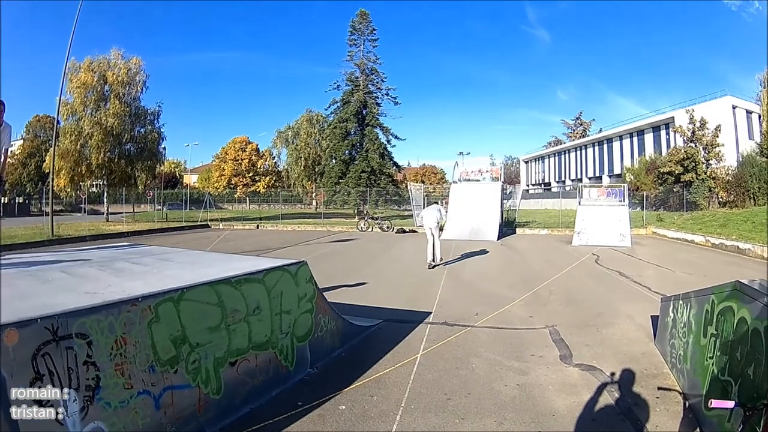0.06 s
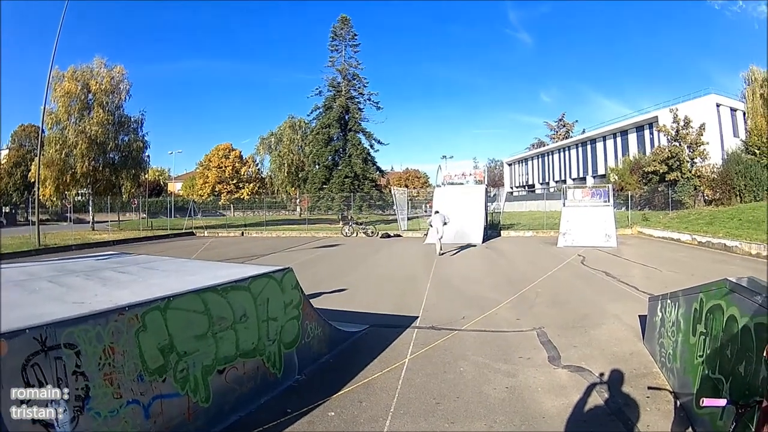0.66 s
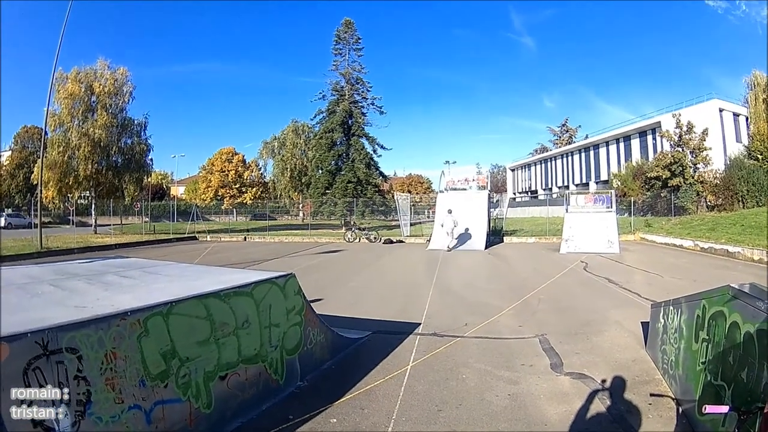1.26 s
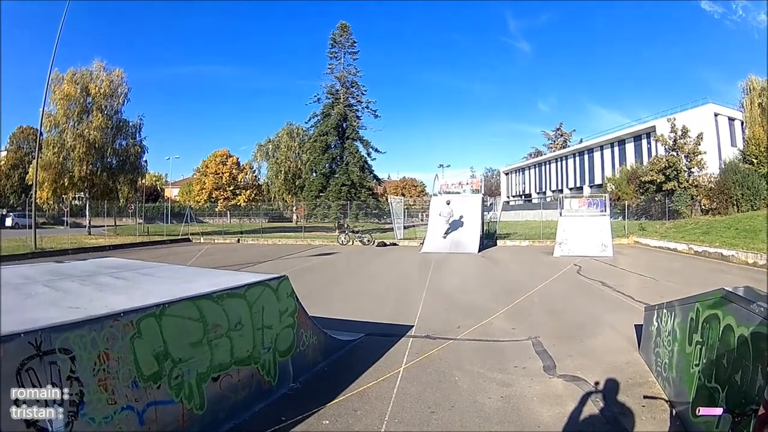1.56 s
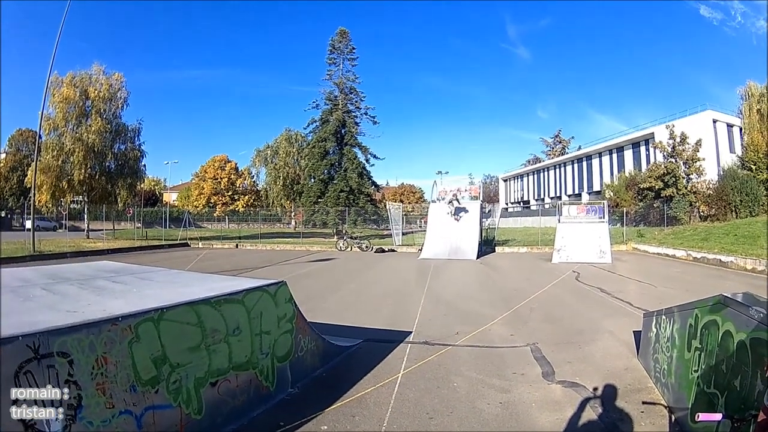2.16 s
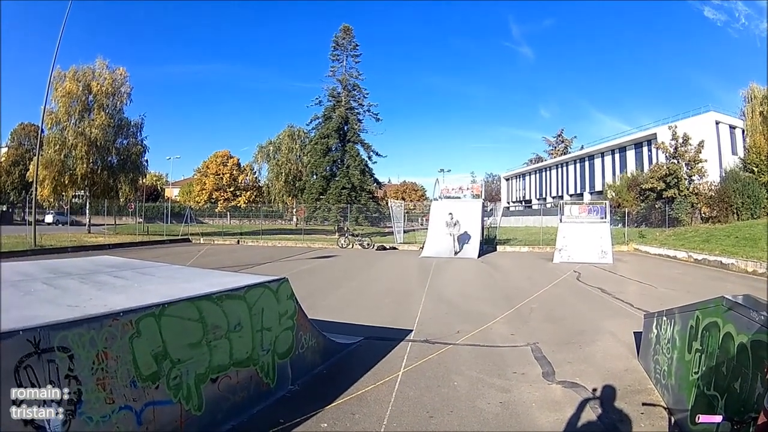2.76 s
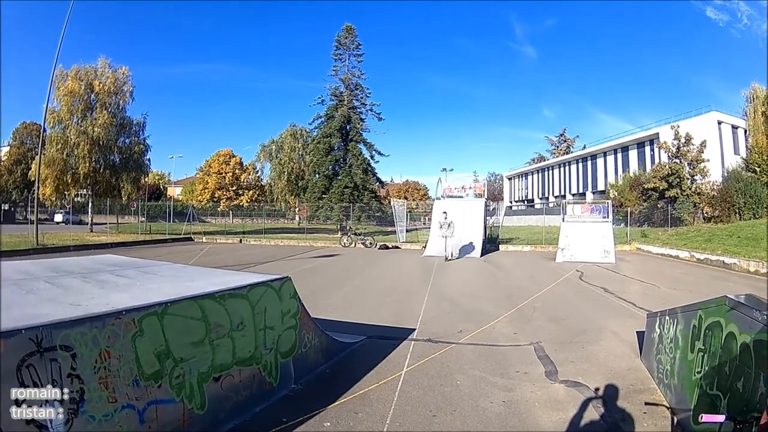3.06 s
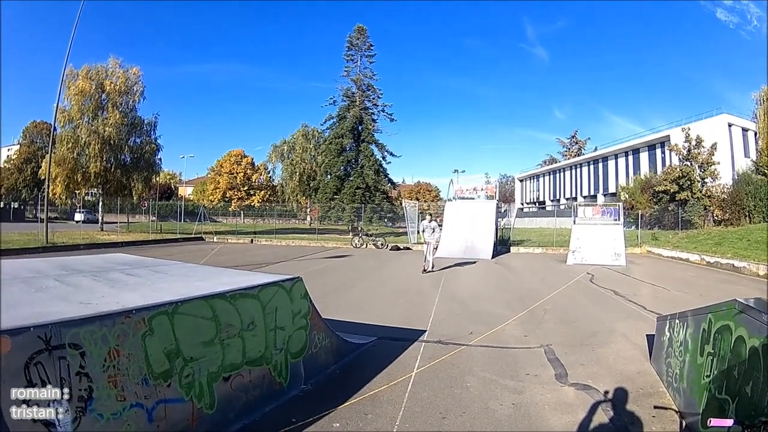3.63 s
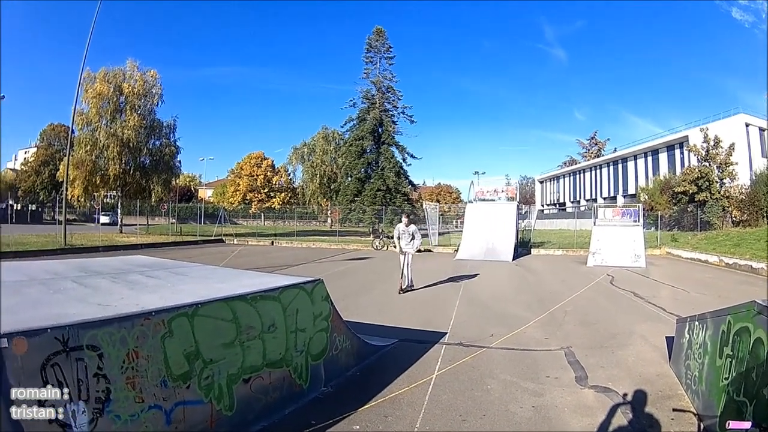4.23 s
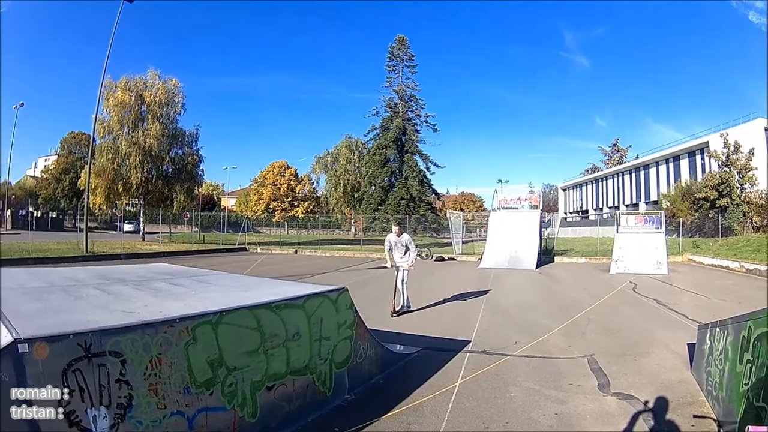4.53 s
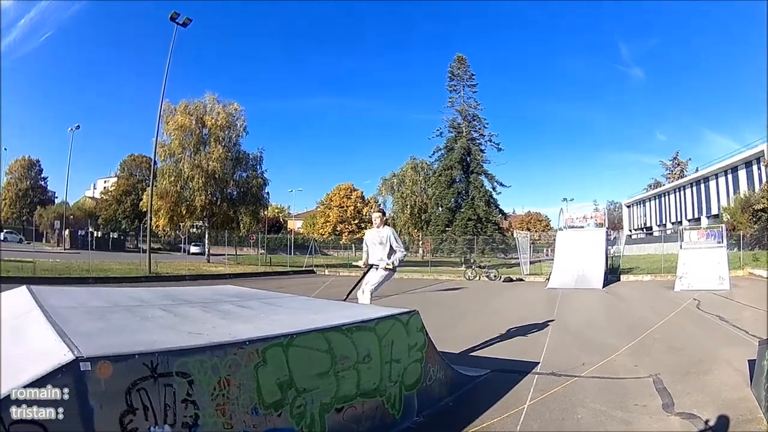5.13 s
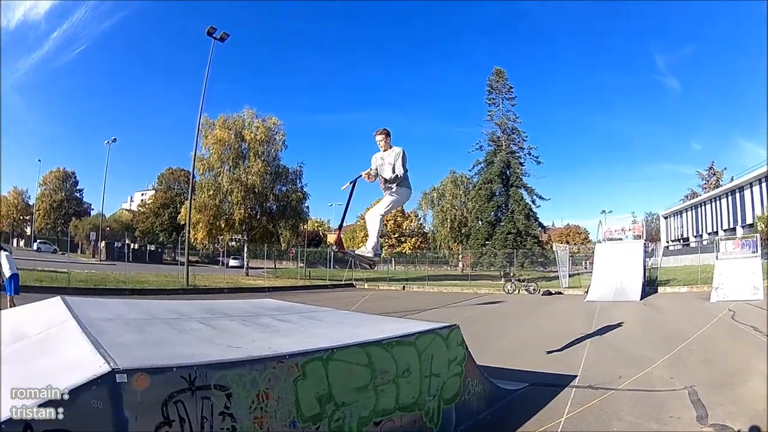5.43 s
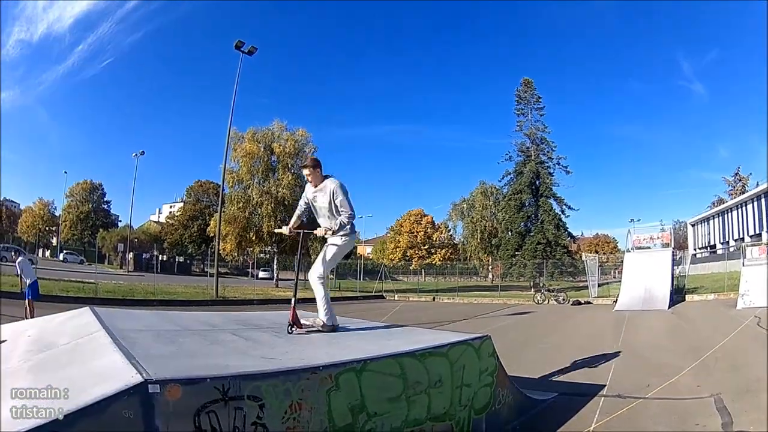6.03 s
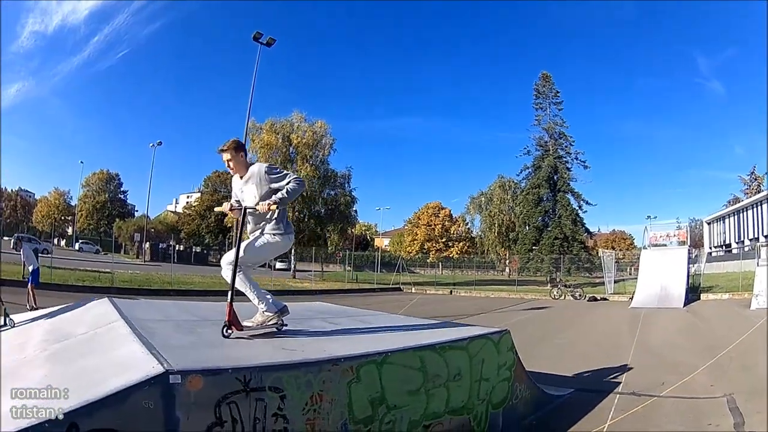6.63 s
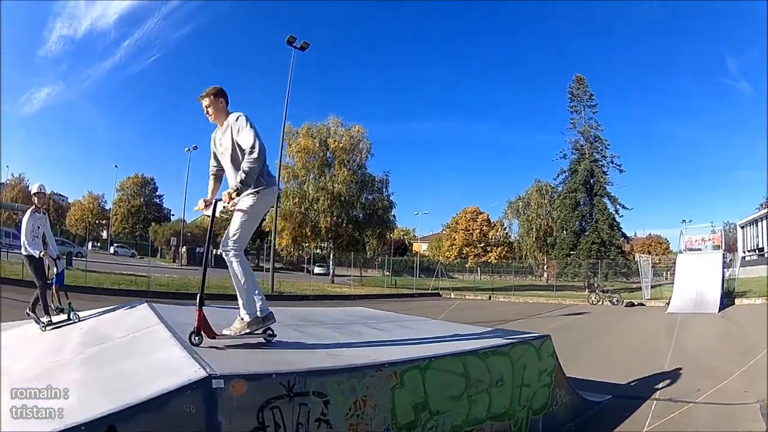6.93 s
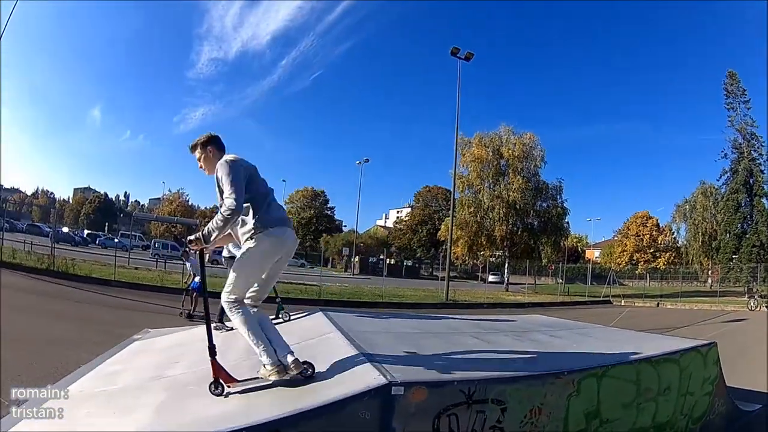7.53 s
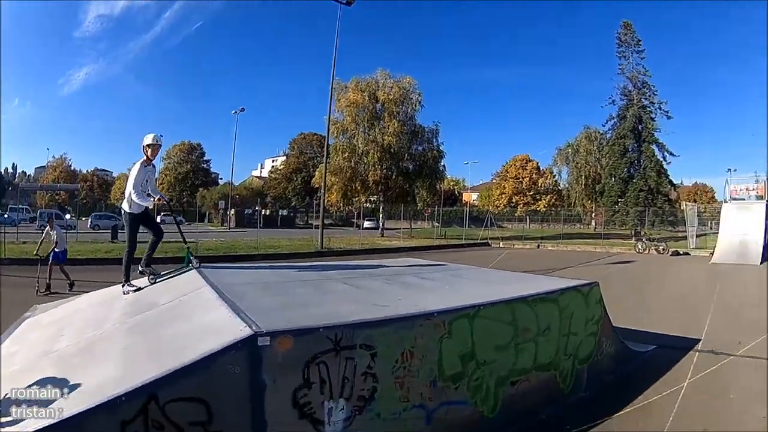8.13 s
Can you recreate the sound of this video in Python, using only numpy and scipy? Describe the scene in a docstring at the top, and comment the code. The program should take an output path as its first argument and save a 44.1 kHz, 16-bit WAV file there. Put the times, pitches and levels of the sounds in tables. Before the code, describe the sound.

A stunt scooter rolls away over gritty concrete in an outdoor skatepark, its hard wheels clacking on joints. It knocks against a distant ramp, goes briefly quiet in the air, lands and rolls back. Close to the microphone it bangs up a hollow box and lands twice with loud, booming, rattling slams. A few last clacks leave a short metallic ping. Faint traffic hums underneath.

```python
"""A stunt scooter rolls away across an outdoor concrete skatepark, hard wheels rumbling over grit and
clacking on joints. It bangs into a far quarter pipe, turns in the air, lands and comes back. It rides
up a hollow box close by and jumps on top: the deck rattles and the box booms. Rubber squeaks, the
scooter drops onto the far slope, and a last knock leaves a metal part ringing. Far traffic lies under
it all."""
import sys
import numpy as np
from scipy import signal
from scipy.fft import rfft, irfft
from scipy.io import wavfile
from scipy.ndimage import uniform_filter1d, minimum_filter1d

SR = 44100
rng = np.random.default_rng(int(sys.argv[2]) if len(sys.argv) > 2 else 0)


def digitize_waveform(pressure):
    """Quantize a signal to 16-bit integers and store it at the path in sys.argv[1].

    Rows of a 2-D input are taken as channels; values are limited to [-1, 1].
    """
    field = np.atleast_2d(pressure).T
    bounded = np.clip(field, -1, 1)
    quanta = np.round(bounded * 32767).astype(np.int16)
    wavfile.write(sys.argv[1], SR, quanta)


N = 365148
TIME = np.arange(N) / SR

# Wheels on the ground: away, up the pipe, down it, back, up the box, across it, down its slope.
# Each row: start and end in seconds, coasting roar in dB, rumble and grit in dB against the roar.
RIDES = [(0, 1.048, -49, -12.5, -20), (1.444, 1.83, -42.5, -13.5, -16), (2.31, 3.266, -45.5, -15.5, -17.5),
         (3.28, 4.67, -50.5, -12.5, -19.5), (4.7, 5.446, -48.5, -11, -13.5),
         (5.87, 6.948, -53.5, -9.5, -21), (7.45, 8.3, -43.5, -8.5, -19.5)]
# The roll's midrange roar, low rumble and crisp grit. Each row: frequency in Hz, level in dB.
ROAR_EQ = [(200, -33), (450, -5.5), (750, -1.5), (1000, -4), (1350, 5), (1650, -3), (2150, -2.5),
           (2700, -5.5), (3500, -27), (5000, -51.5)]
RUMBLE_EQ = [(20, 2), (55, 4), (90, 3.5), (170, 2.5), (350, 3), (600, -4.5), (1200, -53.5)]
GRIT_EQ = [(1500, -18.5), (2700, 9.5), (3600, -1), (4200, -15), (4900, -17), (5700, -25.5), (7000, -45.5)]
def rolling(touch_s=0.075, release_s=0.092, grit_per_load=1.4, patchy_db=2.0):
    """Hard wheels on rough concrete: bumps shake scooter and ground, grit ticks; all grow with load."""
    roar, rumble, grit = np.zeros((3, N))
    for start, end, db, rumble_db, grit_db in RIDES:
        attack = np.clip((TIME - start) / touch_s + 1, 0, 1)
        release = np.exp(-np.maximum(TIME - end, 0) / release_s)
        contact = undb(db) * attack * release
        roar = np.maximum(roar, contact)
        rumble = np.maximum(rumble, undb(rumble_db) * contact)
        grit = np.maximum(grit, undb(grit_db) * contact)
    load_db = wheel_load()
    bumps = grains(N, 3500, spread_db=2.5)
    stones = bumps + grains(N, 120, spread_db=4.5)
    even_bumps = grains(N, 5000, spread_db=0)
    out = roar * undb(load_db) * unit(through(bumps, response(ROAR_EQ, body=0.36)))
    out += rumble * undb(load_db) * unit(through(even_bumps, response(RUMBLE_EQ, body=0.69)))
    out += grit * undb(grit_per_load * load_db) * unit(through(stones, response(GRIT_EQ, body=0.5)))
    return out * undb(patchy_db * drift(45))


# The rider pumps or sinks into a landing.
# Each row: peak time in seconds, extra roar in dB, settling time in seconds.
PRESSES = [(0, 13, 0.13), (.5, 5.5, 0.32), (0.849, 5, 0.11), (1.78, 3, .1), (2.72, 7, 0.39),
           (4.85, 12, 0.15), (6.02, 21.5, 0.14), (6.25, 7.5, 0.32), (7.56, 4, 0.48)]
def wheel_load(rise_s=0.11):
    """Extra roar in dB as the rider's weight presses the wheels down and eases off."""
    return sum(db * np.exp(-np.abs(TIME - s) / np.where(TIME < s, rise_s, settle_s))
               for s, db, settle_s in PRESSES)


# Wheels and deck strike a ramp. Each row: start in seconds, levels of clack, boom, metallic crack
# and ramp ring in dB, time between bounces in seconds, change per bounce in dB.
LANDINGS = [(1.127, -34, -46, -47, -29.5, 0.0094, -2), (1.216, -24, -37.5, -39, -33.5, .008, -5),
            (2.065, -61, -45, -73.5, -45, 0.013, -5), (2.318, -36, -49, -49, -43, 0.011, -8),
            (2.360, -31, -52, -50, -41.5, .02, -11), (4.666, -19, -44, -22.5, -24, .008, -0.5),
            (4.756, -11, -33.5, -18, -25.5, 0.022, -5), (5.031, -36, -48, -54, -43.5, .012, -3),
            (5.870, -8.5, -21, -29.5, -24.5, 0.013, 1), (5.917, -17.5, -27, -38, -25.5, .022, -1),
            (6.085, -24.5, -50, -38, -32.5, .009, -0.5), (7.316, -12, -21, -36.5, -29.5, .0165, -0.5),
            (7.372, -10, -28.5, -30.5, -30, 0.027, -10.5), (7.542, -33, -57, -60, -34.5, 0.019, -5)]
# The tone of those four layers. Each row: frequency in Hz, level in dB.
CLACK_EQ = [(150, -45.5), (450, -12), (800, -10.5), (1050, -4), (1350, 0.5), (1600, -4), (2050, -2),
            (2500, -12), (3200, -24.5), (4200, -44.5), (7000, -57)]
BOOM_EQ = [(20, -26), (75, -16), (130, -3.5), (230, -2.5), (450, -7.5), (800, -11), (2000, -62)]
CRACK_EQ = [(1200, -27), (2400, 2), (3000, 2.5), (3750, -4), (4150, -16.5), (5100, -15), (5700, -27.5),
            (7000, -43), (11000, -25.5), (15000, -65)]
RING_EQ = [(30, -20), (100, -14), (220, -12), (550, -6.5), (900, -3.5), (1350, 4), (1600, -0.5), (2050, -1),
           (2600, -9), (3600, -20), (4200, -31.5), (5000, -39.5), (7000, -46)]
# The voices of the quarter pipe, dulled by distance, and of the hollow box close by.
# Each row: centre in Hz, width in Hz, boost or cut in dB.
FAR_RAMP = [(604, 140, 7), (6500, 2200, -7.5), (12000, 5000, -15)]
NEAR_BOX = [(162, 50, -8.5), (262, 50, 1), (574, 150, 2.5)]
def landings(far_until_s=4, hollow_db=-15, deck_lag_s=0.001943, bounces=3):
    """Each bounce thumps the ramp, rings its panels and hollow, and then clacks the deck."""
    out = np.zeros(N)
    for s, clack_db, boom_db, crack_db, ring_db, bounce_s, bounce_db in LANDINGS:
        place = FAR_RAMP if s < far_until_s else NEAR_BOX
        clack = response(CLACK_EQ, body=1.1, peaks=place)
        ring = response(RING_EQ, body=0.69, peaks=place)
        boom = response(BOOM_EQ, body=0.64, peaks=place)
        crack = response(CRACK_EQ, body=0.54, peaks=place)
        for k in range(bounces):
            thump = blow(boom, t60=0.11, first=.9)
            hollow = undb(hollow_db) * blow(boom, t60=0.45)
            panels = undb(ring_db) * blow(ring, t60=0.57, rate=3000)
            ramp = undb(boom_db) * (thump + hollow) + panels
            deck = undb(clack_db) * blow(clack, t60=0.11, first=0.3, rate=1800)
            deck += undb(crack_db) * blow(crack, t60=0.06, first=0.5, rate=2000)
            add(out, s + k * bounce_s, undb(k * bounce_db) * ramp)
            add(out, s + k * bounce_s + deck_lag_s, undb(k * bounce_db) * deck)
    return out


# Wheels hit joints and the deck knocks. Each row: start in seconds, level in dB before the trim,
# ringing pitch in Hz, treble and bass in dB (neutral at flat_treble_db and flat_bass_db).
CLACKS = [(.277, -30.5, 2420, -26.5, -17), (0.454, -21.5, 1374, -16, -30), (.486, -28, 2260, -27, -27),
          (.503, -21, 2340, -23, -10), (.567, -25, 2330, -20.5, -6), (.608, -9, 2335, -24.5, -27),
          (.644, -24, 1440, -18.5, -20), (.693, -26, 1470, -21, -29), (.822, -20, 1342, -27, -29),
          (1.429, -25, 1240, -27, -28), (1.505, -23.5, 1400, -29, -16), (1.605, -27.5, 3620, -18, -12),
          (1.716, -30.5, 3550, -16, -22), (1.842, -25.5, 1890, -24, -24), (2.132, -22, 940, -25, -25),
          (2.161, -31, 906, -25, -16), (2.45, -28, 2110, -26, 2), (2.706, -22.5, 1180, -24, -12),
          (2.786, -26, 1200, -16.5, -6), (2.881, -19.5, 1450, -11.5, -9), (2.933, -26.5, 1400, -21, 0),
          (3.048, -29, 1340, -22, -20), (3.233, -28.5, 1480, -29, -6), (3.543, -17, 1570, -22.5, -19),
          (4.008, -26.5, 1440, -31, -29), (4.151, -30.5, 1620, -19, -11), (4.238, -31.5, 1340, -16.5, -3.5),
          (5.012, -27.5, 1430, -21, -5), (5.803, -29.5, 1250, -51, -6.5), (6.932, -31, 1440, -24.5, -26),
          (7.159, -32, 1226, -20, -14), (7.997, -15, 2030, -30, -17), (8.004, -16.5, 1420, -25.5, -29),
          (8.086, -21.5, 1340, -21.5, -32), (8.145, -18, 1750, -30.5, -35), (8.175, -23, 1540, -28, -13),
          (8.268, -21, 1830, -21, -20)]
# The basic tone of a knock. Each row: frequency in Hz, level in dB.
KNOCK_EQ = [(60, -17.5), (300, -2), (800, -0.5), (1400, 0), (2550, 0.5), (2900, -5.5), (3700, -8.5),
            (4200, -24.5), (5000, -22.5), (5800, -29), (7000, -50)]
def clacks(trim_db=-1.97, ring_cycles=40, rattle_db=-16, flat_treble_db=-19, flat_bass_db=-12):
    """Short pitched knocks, the higher the shorter; loose parts rattle after them."""
    out = np.zeros(N)
    hz, knock_db = np.transpose(KNOCK_EQ)
    treble, bass = np.interp(hz, [2550, 3200], [0, 1]), hz < 600
    for s, db, pitch_hz, treble_db, bass_db in CLACKS:
        tone_db = knock_db + treble * (treble_db - flat_treble_db) + bass * (bass_db - flat_bass_db)
        ring = [(pitch_hz, 240, 11), (pitch_hz, 900, 3)]  # a narrow peak on a wide skirt
        shares = 0.92 * rng.random(len(BODY_MODES))  # the contact point decides which modes answer
        h = response(np.column_stack([hz, tone_db]), body=shares, peaks=ring)
        knock = blow(h, t60=ring_cycles / pitch_hz, first=0.42, build_s=.0008)
        rattle = undb(rattle_db) * blow(h, t60=0.13, rate=630)
        add(out, s, undb(db + trim_db) * (knock + rattle))
    return out


# Low weight under the hits. Each row: start in seconds, level in dB.
THUDS = [(2.067, -46.5), (2.332, -52), (4.241, -54), (4.628, -49), (5.884, -33), (7.319, -33.5),
         (7.373, -35)]
# Their bass-heavy tone. Each row: frequency in Hz, level in dB.
THUD_EQ = [(15, -5.5), (45, 0.5), (75, -3.5), (118, 2), (180, -2.5), (400, -39)]
def thuds():
    """The rider's weight comes down on the surface with a deep, soft push."""
    out, h = np.zeros(N), response(THUD_EQ)
    for s, db in THUDS:
        add(out, s, undb(db) * blow(h, t60=0.28, first=1))
    return out


# The scooter's thin tubes. Each row: pitch in Hz, gain in dB before the trim, t60 in seconds.
TUBE_MODES = [(2760, -10.5, 0.096), (3580, -9, 0.38), (3740, -9, .28), (4670, 2, 0.41), (4740, -3, .35)]
def tube_ring(hits, trim_db=2):
    """Every hit leaves the tubes ringing faintly."""
    t, h = TIME[:SR], 0
    for hz, db, t60 in TUBE_MODES:
        fade = decay(t60)
        mode = 2 * fade * np.sin(2 * np.pi * hz * t) / fade.sum()  # unity gain at resonance
        h = h + undb(db) * mode
    return undb(trim_db) * through(hits, h)


# The closing ping. Each row: pitch in Hz, level in dB, t60 in seconds.
METAL_MODES = [(2710, -36, 0.12), (4210, -63, 0.4), (4700, -59, 0.53), (5340, -61, .25), (6024, -60, .18),
               (6900, -75.5, .2)]
def metal_ring(start_s=8.086):
    """A metal part of the scooter rings on after a knock."""
    out, t = np.zeros(N), TIME[:SR]
    for hz, db, t60 in METAL_MODES:
        add(out, start_s, undb(db) * np.sin(2 * np.pi * hz * t) * decay(t60))
    return out


# Rubber chirps. Each row: start and length in seconds, centre pitch in Hz, level in dB,
# rise as a share of the pitch.
SQUEAKS = [(6.604, 0.013, 1736, -45.5, 0.21), (6.637, 0.023, 1785, -45.5, 0.14),
           (6.695, 0.023, 1620, -43, -0.19), (6.763, 0.03, 1830, -44, 0.2), (7.322, 0.03, 1980, -11, 0.037)]
def squeaks(roughness=0.021):
    """Rubber slips with a short, rough glide in pitch."""
    out = np.zeros(N)
    for s, length, hz, db, rise in SQUEAKS:
        progress = np.linspace(0, 1, int(length * SR))
        pitch = hz * (1 + rise * (progress - .5) + roughness * drift(530)[:len(progress)])
        tone = np.sqrt(2) * np.sin(2 * np.pi * np.cumsum(pitch) / SR)
        add(out, s, undb(db) * np.sin(np.pi * progress) * tone)
    return out


# Swells of chatter. Each row: start and end in seconds, level in dB.
RATTLES = [(1.54, 1.87, -48.5), (2.6, 3.1, -45.5)]
def rattles(t60=0.044, deck_db=-2, metal_db=-6):
    """Deck and loose metal parts shake at random on the curve of the far ramp."""
    deck = undb(deck_db) * blow(response(KNOCK_EQ, body=.8, peaks=FAR_RAMP), t60, first=.5)
    metal = undb(metal_db) * blow(response(CRACK_EQ, body=.9), t60, first=0.41)
    chatter = through(grains(N, 70, spread_db=4), deck + metal)
    return unit(chatter) * sum(undb(db) * swell(start, end) for start, end, db in RATTLES)


# The wheels' low hum, and their high whine on the smooth ramps.
# Each row: start and end in seconds, first and last pitch in Hz, level in dB.
HUMS = [(.1, .62, 112, 205, -49), (1.12, 1.62, 182, 118, -54), (2.28, 2.8, 130, 211.3, -53.5)]
WHINES = [(2.25, 3.2, 2248, 1992, -47), (7.75, 8.02, 2070, 2250, -46)]
def wheel_tones(glides, waver, waver_hz, flutter_db):
    """Unsteady wheel tones swell and fade, their pitch gliding with the speed."""
    out, unsteady = np.zeros(N), 1 + waver * drift(waver_hz)
    for start, end, first_hz, last_hz, db in glides:
        pitch = np.interp(TIME, [start, end], [first_hz, last_hz]) * unsteady
        out += undb(db) * swell(start, end) * np.sin(2 * np.pi * np.cumsum(pitch) / SR)
    return out * undb(flutter_db * drift(60))


# Runs of ticking. Each row: start and end in seconds, turns per second, level in dB.
WHEEL_TICKS = [(0.019, .23, 24.5, -51), (5.15, 5.40, 33, -56)]
def wheel_ticks(scatter_db=2):
    """A small bright rattle at every turn of a wheel."""
    bright_eq = [(1500, -29.5), (3000, 9), (4200, -15), (5000, -12), (6200, -16.5), (7000, -22.5)]
    out, h = np.zeros(N), response(bright_eq, body=.6)
    for start, end, turns_per_s, db in WHEEL_TICKS:
        for s in np.arange(start, end, 1 / turns_per_s):
            add(out, s, undb(db + scatter_db * rng.standard_normal()) * blow(h, t60=0.037, first=.3))
    return out


def echoes(x, t60=0.55, wet_db=-13, delay_s=.012):
    """Scattered reflections from ramps, fence and buildings."""
    h = grains(SR, 1200, spread_db=1.5) * decay(t60) * (TIME[:SR] > delay_s)
    return undb(wet_db) * through(x, h / np.linalg.norm(h))


# The tone of the background bed. Each row: frequency in Hz, level in dB.
TOWN_EQ = [(15, -52.5), (25, -14.5), (273, -14), (386, -18), (706, -6.5), (891, -8), (1350, -1.5),
           (1670, -6.5), (2530, -14.5), (3500, -25.5), (4120, -40.5), (4840, -37), (6400, -53),
           (8320, -81.5), (14100, -120)]
def town_air(level_db=-49, swell_db=0.33):
    """Far traffic and town air, swelling gently; distant tyres gather in one band."""
    air = through(rng.standard_normal(N), response(TOWN_EQ, peaks=[(1340, 690, 3)]))
    return unit(air) * undb(level_db + swell_db * drift(6.6))


# Resonances of scooter and ramp. Each row: centre in Hz, width in Hz, boost in dB at body=1.
BODY_MODES = [(260, 76, 5), (767, 110, 7), (1226, 200, 2), (1363, 160, 4), (1810, 130, 6.5), (2002, 92, 6),
              (2140, 60, 2.5), (2850, 85, 0), (3515, 150, 8.5), (4694, 580, 9)]
def response(eq, body=0, peaks=(), size=4096):
    """Impulse response of energy 1: a broad EQ curve, a share of the body modes, and extra peaks."""
    hz = np.maximum(np.arange(size // 2 + 1) * SR / size, 1)
    eq_hz, eq_db = np.transpose(eq)
    db = np.interp(np.log(hz), np.log(eq_hz), eq_db)
    shares = np.broadcast_to(body, len(BODY_MODES))
    modes = [(centre, width, boost * share) for (centre, width, boost), share in zip(BODY_MODES, shares)]
    for centre, width, boost in modes + list(peaks):
        db = db + boost / (1 + (2 * (hz - centre) / width) ** 2)
    # minimum phase keeps the attack at the front
    cepstrum = irfft(np.log(undb(db)))
    cepstrum[1:size // 2] *= 2
    cepstrum[size // 2 + 1:] = 0
    h = irfft(np.exp(rfft(cepstrum)))
    return h / np.linalg.norm(h)


def blow(h, t60, first=0, rate=4000, build_s=0.0011):
    """A first contact and a chatter of rebounds that builds and dies, heard through h."""
    fade = decay(t60)
    force = grains(SR, rate, spread_db=2.5) * fade * (1 - np.exp(-TIME[:SR] / build_s))
    force /= np.linalg.norm(force) + 1e-9
    force[0] += first
    x = through(force, h)
    return x * np.linalg.norm(fade) / np.linalg.norm(x)


def grains(samples, rate, spread_db):
    """Tiny random contacts, about rate a second, a few much harder than the rest."""
    timing, strength, polarity = rng.random((samples, 3)).T
    hardness = np.minimum(-np.log(1 - strength), 5)
    return (timing < rate / SR) * undb(spread_db * hardness) * np.sign(polarity - .5)


def drift(rate_hz):
    """Smooth random modulation of rms 1."""
    hold = int(SR / rate_hz)
    steps = np.repeat(rng.standard_normal(N // hold + 1), hold)
    return unit(uniform_filter1d(uniform_filter1d(steps, hold), hold)[:N])


def decay(t60):
    """A one-second envelope that falls 60 dB in t60 seconds."""
    return np.exp(-np.log(1000) * TIME[:SR] / t60)


def swell(start, end):
    """An arch from 0 up to 1 and back between two times."""
    return np.sin(np.pi * np.clip((TIME - start) / (end - start), 0, 1)).clip(0) ** .5


def through(x, h):
    """Pass x through the response h."""
    return signal.fftconvolve(x, h)[:len(x)]


def undb(db):
    """Decibels to gain."""
    return 10 ** (np.asarray(db) / 20)


def unit(x):
    """Scale to rms 1."""
    return x / np.sqrt(np.mean(x ** 2))


def add(out, s, x):
    """Mix x in from s seconds."""
    i = max(int(s * SR), 0)
    out[i:i + len(x)] += x[:max(N - i, 0)]


def scene():
    """The mono mix: all hits ring the tubes, and only clacks and ticks feed the echoes."""
    knocks = clacks() + wheel_ticks()
    hits = knocks + landings() + thuds()
    hum = wheel_tones(HUMS, waver=0.23, waver_hz=150, flutter_db=4.5)
    whine = wheel_tones(WHINES, waver=.06, waver_hz=680, flutter_db=4.0)
    tails = tube_ring(hits) + metal_ring() + echoes(knocks)
    ride = rattles() + squeaks() + rolling() + hum + whine
    return (hits + tails + ride + town_air())[None]


def record(dry, ceiling=0.64, top_hz=6950):
    """A fast limiter holds the landings down; a steep low-pass cuts the top."""
    gain = np.minimum(1, ceiling / (np.abs(dry) + 1e-9))
    gain = uniform_filter1d(minimum_filter1d(gain, size=161), size=161)
    return signal.sosfilt(signal.ellip(7, .2, 21, top_hz, fs=SR, output="sos"), dry * gain)


dry = scene()
out = record(dry)
digitize_waveform(out)
```